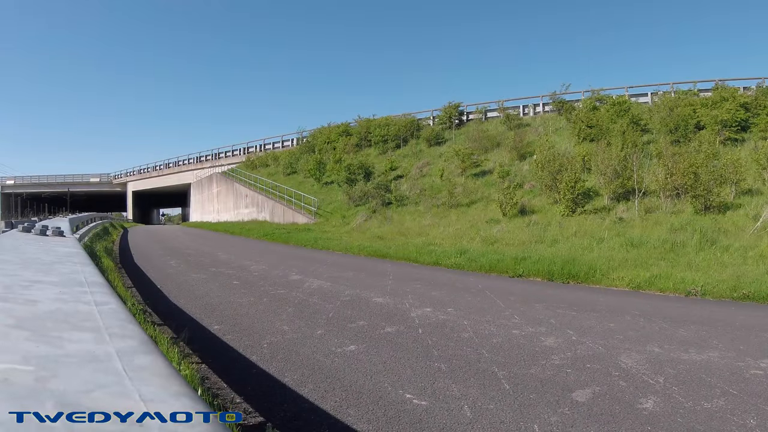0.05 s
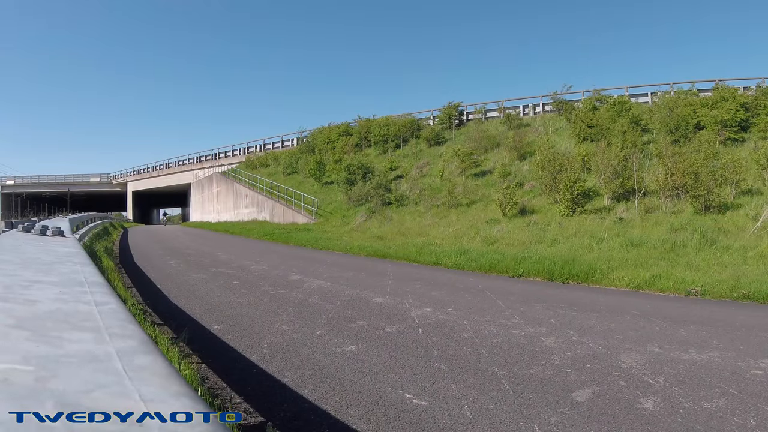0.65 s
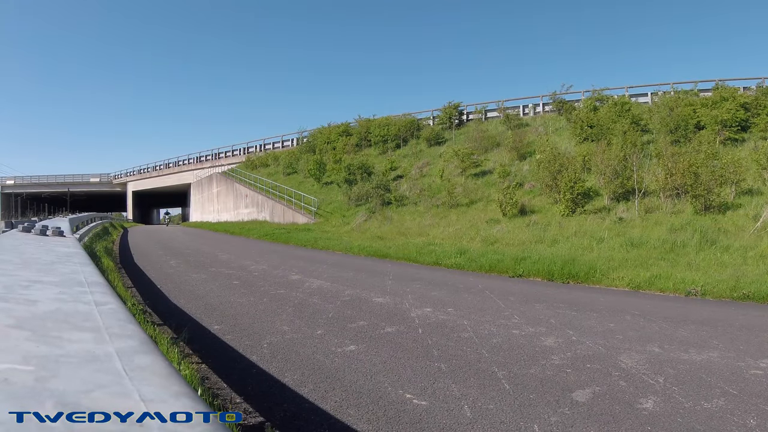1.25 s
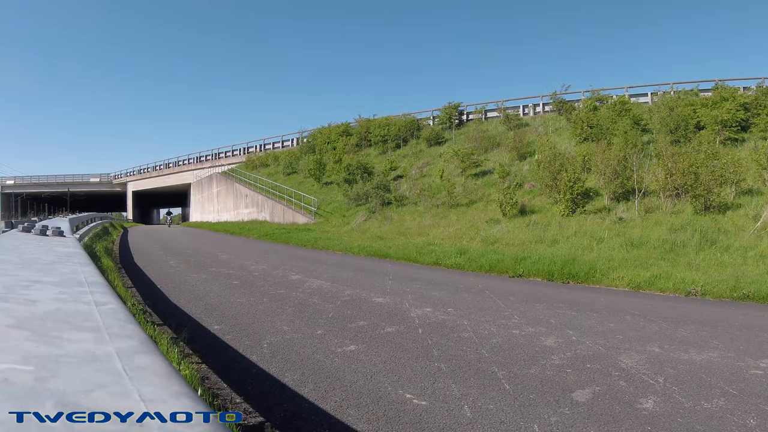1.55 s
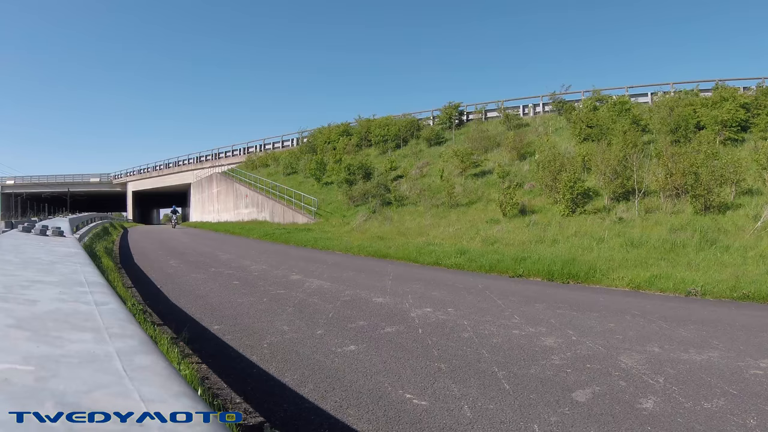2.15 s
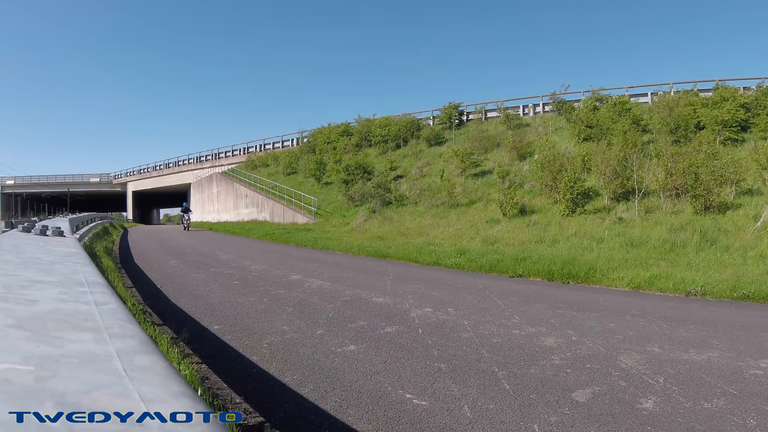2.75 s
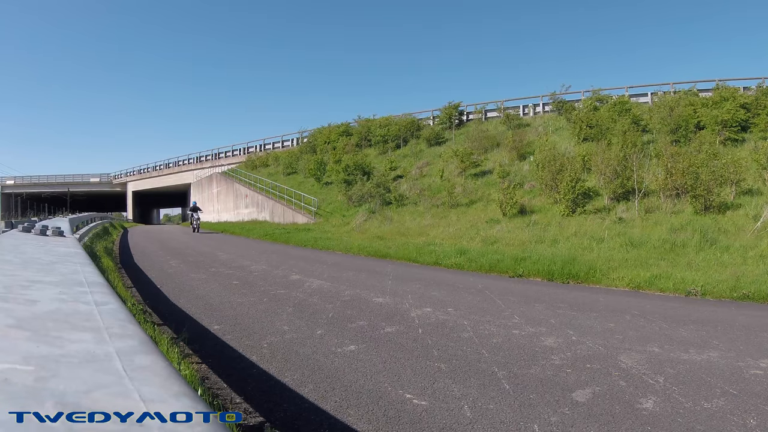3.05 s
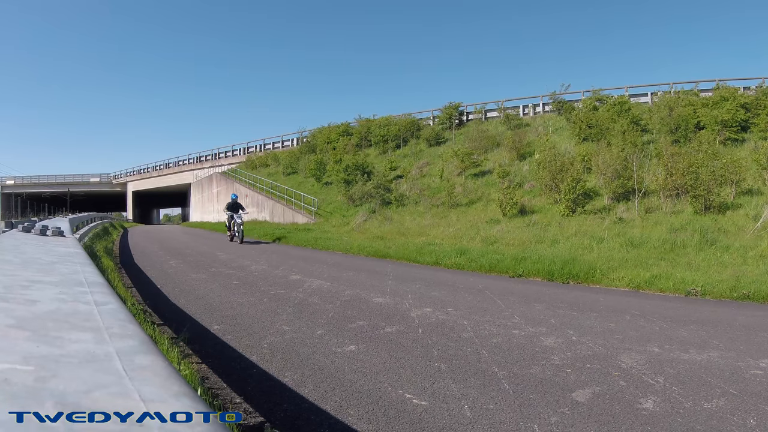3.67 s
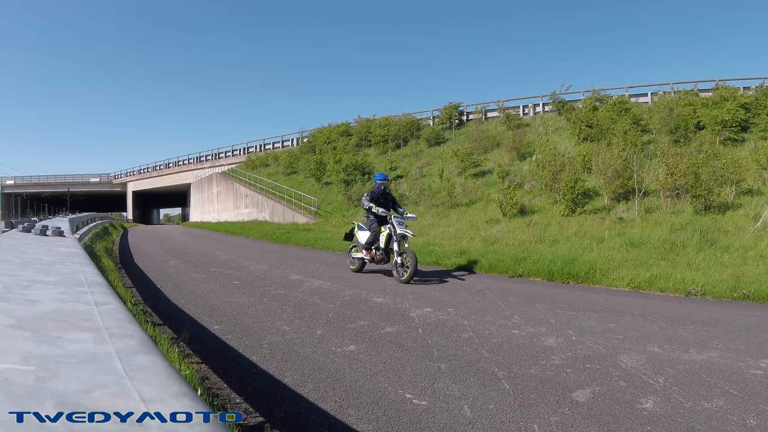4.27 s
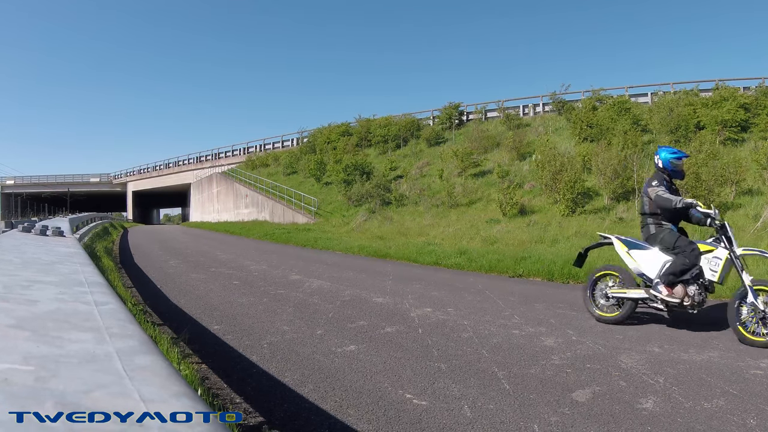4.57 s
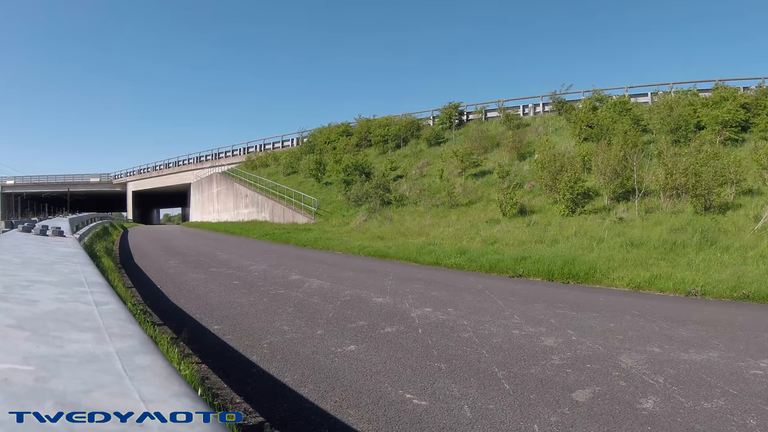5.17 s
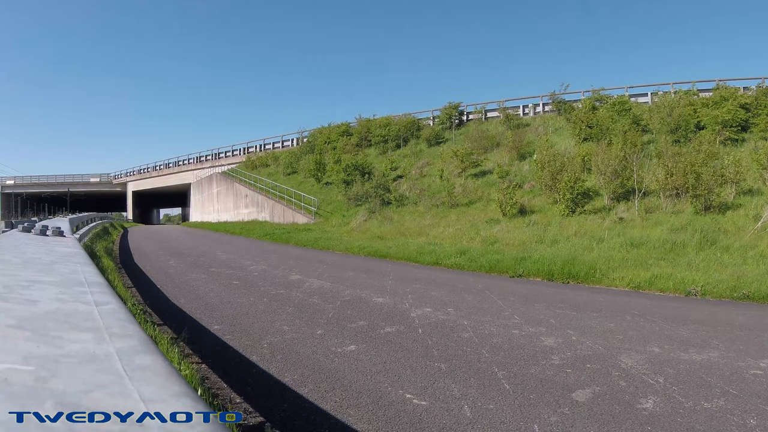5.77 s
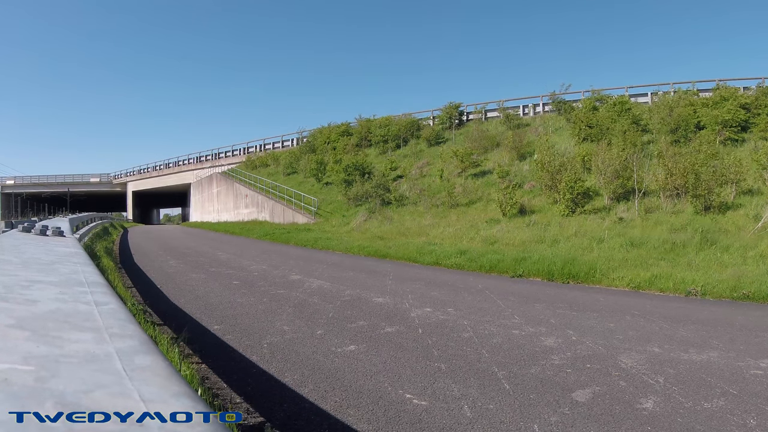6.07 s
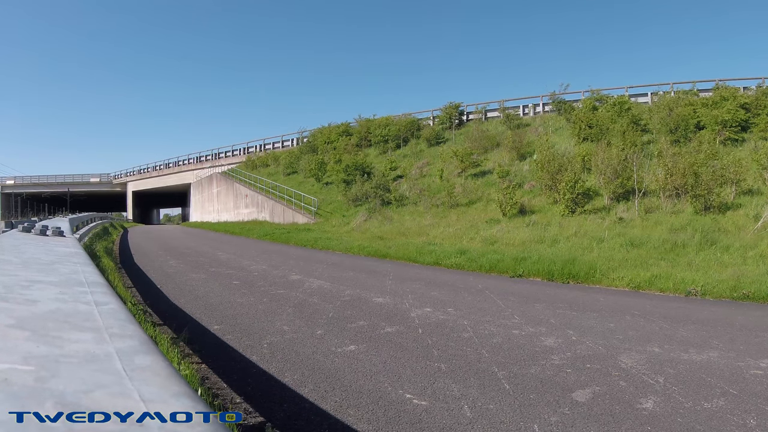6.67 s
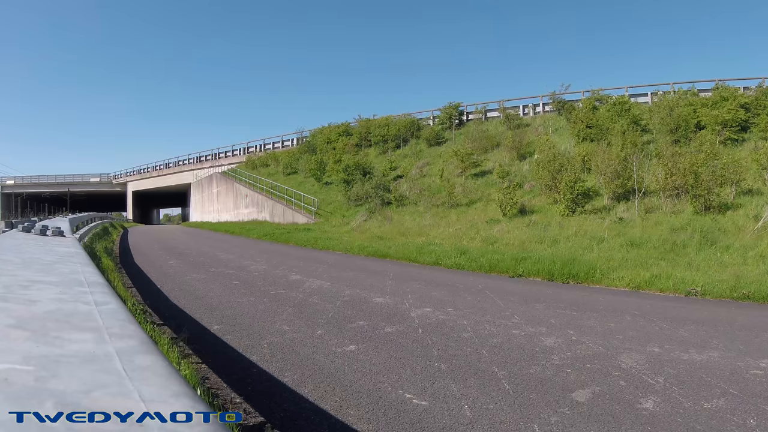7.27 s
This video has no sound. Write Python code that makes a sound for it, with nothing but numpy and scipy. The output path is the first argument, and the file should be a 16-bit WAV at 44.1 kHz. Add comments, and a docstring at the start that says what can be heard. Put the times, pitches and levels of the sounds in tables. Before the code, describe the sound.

Wind gusts on the microphone as a motorcycle revs hard, approaches, rolls past and fades with sputtering exhaust pops.

```python
"""Supermoto wheelie and pass-by

A big single-cylinder bike blips its throttle in an underpass, revs hard into a wheelie, rolls past on a
shut throttle and coasts away, thumping and popping. Each firing pulses the airbox and rings the pipe;
unburnt fuel makes the pops. Valves clatter, gears whine, gusts buffet the microphone.
At the very end the sound jumps, with a tick, to a steady, hissier cruise."""
import sys
import numpy as np
from scipy import signal
from scipy.fft import rfft, irfft
from scipy.io import wavfile
from scipy.ndimage import uniform_filter1d, minimum_filter1d

SR = 44100
rng = np.random.default_rng(int(sys.argv[2]) if len(sys.argv) > 2 else 0)


def log_audio(samples):
    """Write samples as a 16-bit WAV file to the path given in sys.argv[1]."""
    # one column per channel
    frames = np.atleast_2d(samples).T
    # limit to full scale, then quantise
    limited = np.clip(frames, -1, 1)
    pcm = np.round(limited * 32767).astype(np.int16)
    wavfile.write(sys.argv[1], SR, pcm)


N = 332073
T = np.arange(N) / SR

# throttle twists: open t/s, flare length/s, flare rise/Hz, pull t/s, shut t/s, pull rise/Hz
TWISTS = [(1.041, .261, 16.4, 1.302, 1.613, 6.6), (2.875, .28, 15.82, 3.221, 3.624, 4.3)]
# firing rate set by the wheels: t/s, f/Hz
ROLLING_RATE = [(0, 29.49), (1.3, 31.11), (1.7, 33.55), (2.9, 36.79), (3.1, 41.5), (3.3, 43.15),
                (3.85, 48.39), (4.45, 44.95), (5, 39.9), (6, 31.45), (7.1, 23.64)]
# cracks: t/s, body level/dB, body f/Hz, ring level/dB, ring f/Hz, sizzle level/dB, shove level/dB; the rows at
# 5.08, 5.11 and 5.26 s are louder ordinary firings, the rest afterfire pops
CRACKS = [(1.998, -39, 405, -44.5, 1560, -49, -45), (5.082, -38, 420, -35, 1400, -60, -28),
          (5.107, -42, 450, -34.5, 1460, -55, -36), (5.237, -35, 400, -32.5, 1460, -45, -25),
          (5.264, -43, 450, -46, 1680, -59, -33), (5.451, -16, 550, -22, 1970, -23.5, -3.5),
          (5.709, -26.5, 467, -35, 2600, -48, -14.5), (5.982, -36, 410, -38.5, 1130, -56, -35),
          (6.078, -35, 715, -31, 1020, -46, -15), (6.210, -30, 430, -37.5, 1350, -42.5, -29),
          (6.312, -31.5, 610, -36, 1760, -45, -28), (6.347, -47, 600, -48, 1570, -59, -41),
          (6.415, -32, 700, -37, 1550, -48, -25), (6.524, -49, 610, -42, 1620, -61, -35.5),
          (6.632, -41, 720, -36.5, 1470, -62, -43), (6.748, -47, 930, -31.5, 1470, -64, -40),
          (6.787, -51, 700, -45, 1400, -65, -37), (6.826, -53, 700, -45.5, 1400, -70, -39),
          (6.864, -46, 820, -38.5, 1480, -65, -38), (6.905, -48, 700, -43, 1400, -64, -36),
          (6.985, -48, 1200, -46, 2060, -68, -44), (7.028, -47, 700, -45, 1400, -62, -37),
          (7.071, -37, 600, -39, 1410, -60, -36)]
# gear and chain tones: multiple of firing rate, level/dB, peak t/s, half-width/s
MESH_TONES = [(46, -48, 3.93, .11), (72, -53, 3.95, .09), (16, -46, 4.68, .14), (23, -43, 4.82, .2),
              (28, -42, 4.6, .22), (31.7, -38.5, 4.66, .16), (33.7, -41, 4.72, .11), (43, -43, 4.53, .08),
              (36.1, -53, 5.33, .15)]
# upper pipe resonances: f/Hz
PIPE_RINGS_HZ = [1160, 1400, 1720, 2380, 4100]
# wind level, dipping at times: t/s, relative level/dB
WIND_LEVEL = [(0, -27), (.44, -25.5), (.51, -35), (.6, -24.5), (1.2, -26.5), (1.9, -24.5), (2.2, -28),
              (2.7, -31), (3.35, -36), (3.9, -26.5), (4.9, -36.5), (5.3, -31.5), (6.4, -31.5), (6.7, -28),
              (7.15, -25.5), (7.25, -29), (7.53, -26.5)]
# hard gusts: peak t/s, half-width/s, level/dB
HARD_GUSTS = [(0.023, 0.031, -25.5), (0.132, 0.033, -36.5), (0.316, 0.041, -36.5), (0.395, 0.022, -36.5),
              (0.467, 0.014, -31), (0.667, 0.016, -26.5), (0.81, 0.067, -38), (1.008, 0.017, -30),
              (1.7, 0.045, -20.5), (1.827, 0.051, -20.5), (1.951, 0.008, -21.5), (2.001, 0.015, -27),
              (4.236, 0.021, -27), (7.082, 0.02, -26), (7.172, 0.068, -14)]
# airbox facing the listener: t/s, weight
FACING = [(3.55, .047), (3.7, .71), (4.6, .29), (5.4, .062), (7.16, .091), (7.17, .5)]
# engine power ringing in the underpass: t/s, share
UNDERPASS_SHARE = [(1.7, .45), (2.9, .2), (3.12, 0)]

# source spectra: f/Hz, relative level/dB
RUMBLE_EQ = [(8, -13), (25, -2.5), (55, -4.5), (90, -6.5), (150, -14.5), (250, -28), (500, -56.5),
             (1500, -93), (8000, -100)]
BUFFET_EQ = [(30, 5.5), (90, 0.5), (180, 2), (300, -3.5), (500, -13.5), (900, -25.5), (2000, -45),
             (3500, -52.5), (5000, -79), (10000, -102.5)]
CLATTER_EQ = [(100, -6.5), (350, 9), (650, 1), (850, -3), (1050, -2), (1400, -0.5), (2100, -6),
              (2800, -11.5), (4000, -18), (9000, -64)]
HISS_EQ = [(1500, -20.5), (2800, 7), (3600, 3.5), (4700, 3.5), (6200, 0.5), (7200, -14.5), (10500, -21),
           (11800, -33.5), (13500, -29.5), (15500, -66)]
HONK_EQ = [(60, -41), (150, 12.5), (240, 0), (290, 1.5), (335, 0), (410, -2.5), (480, 1.5), (550, -9.5),
           (640, -14), (720, -5), (860, -22), (1100, -30), (1400, -47), (5000, -75)]
SPIT_EQ = [(500, -14), (1300, 10), (2000, 6), (3000, 3), (4700, -3), (6200, -3.5), (7200, -16),
           (10000, -24), (11500, -46), (15000, -62.5)]
TEAR_EQ = [(500, -14.5), (950, 0), (1350, 5.5), (1700, -5), (2000, 2), (2600, -11), (3200, -13.5),
           (6000, -21), (7500, -23), (14000, -56)]
POP_EQ = [(100, 3.5), (500, 11.5), (1500, -2.5), (4000, -2.5), (6200, -11.5), (7500, -16.5), (11000, -30),
          (15000, -54.5)]
GULP_EQ = [(40, 11), (150, 4), (290, 6), (345, 2), (400, 8.5), (520, -5), (660, -8), (830, -22),
           (1020, -38), (1300, -50.5), (3000, -51), (10000, -101)]
BARK_EQ = [(200, -24), (400, 5.5), (520, 0.5), (660, 6), (850, -1.5), (1030, 7), (1250, -8.5), (1750, -5.5),
           (2600, -22.5), (6000, -46), (11000, -51.5)]
RASP_EQ = [(150, -19), (580, -18), (850, 11), (1400, -7.5), (2500, 1), (4000, -7), (5200, -7.5),
           (6200, -13.5), (7300, -25), (11000, -44), (15000, -76)]
THUMP_EQ = [(20, -30.5), (40, -13.5), (80, 7), (125, 8), (170, 1), (250, 1.5), (340, -7.5), (420, -11.5),
            (480, -21.5), (570, -14.5), (800, -26), (1500, -19), (4000, -88), (12000, -100)]
AIR_EQ = [(1000, -10), (4000, -11.5), (9000, 2.5), (12000, -13)]
FIZZ_EQ = [(5000, -25), (7500, 0), (9800, -10), (11000, -30)]
ROAR_EQ = [(500, -28.5), (850, -10.5), (1050, 2.5), (1450, -3), (1800, -9), (2600, -8.5), (6000, -43.5)]

EXIT_S, PASS_S, CRUISE_S = 2.98, 4.674, 7.165  # near the underpass mouth, closest, cruise onset
NEAR_S = .43  # closest distance / speed


def gain_of(db):
    """dB to amplitude."""
    return 10 ** (np.asarray(db) / 20)


def unit_rms(x):
    """Scale to rms 1."""
    return x / np.sqrt(np.mean(x ** 2) + 1e-20)


def curve(rows):
    """Breakpoints to samples."""
    return np.interp(T, *np.transpose(rows))


def ease(u):
    """Smooth step, 0 to 1."""
    return np.sin(np.pi / 2 * np.clip(u, 0, 1)) ** 2


def bump(peak_s, half_width_s):
    """Gaussian window, peak 1."""
    return np.exp(-((T - peak_s) / half_width_s) ** 2)


def noise():
    """White noise, rms 1."""
    return rng.standard_normal(N)


def drift(hz):
    """Low-passed noise, rms 1."""
    return unit_rms(irfft(rfft(noise()) / (1 + (np.fft.rfftfreq(N, 1 / SR) / hz) ** 4), N))


def colour(x, eq, size=8192):
    """Minimum-phase filter of unit energy."""
    hz, db = np.transpose(eq)
    bins_hz = abs(np.fft.fftfreq(size, 1 / SR))
    log_gain = np.log(gain_of(np.interp(np.log(bins_hz + 1), np.log(hz), db)))
    impulse = np.fft.ifft(np.exp(np.conj(signal.hilbert(log_gain)))).real[:size // 2]
    return signal.oaconvolve(x, impulse / np.linalg.norm(impulse))[:len(x)]


def resonate(x, hz, width_hz):
    """Resonance, peak gain 1."""
    return signal.lfilter(*signal.iirpeak(hz, hz / width_hz, fs=SR), x)


def steep_ring(x, hz, width_hz):
    """Double resonance, scaled to the energy of 10 ms at rms 1."""
    ring = resonate(resonate(x, hz, width_hz), hz, width_hz)
    return ring / np.linalg.norm(ring) * np.sqrt(SR / 100)


def echo(x, t60_s, delay_s):
    """Sparse decaying reflections."""
    t = T[:SR]
    taps = rng.standard_normal(SR) * (rng.random(SR) < 2000 / SR)
    taps *= (t > delay_s) * gain_of(-60 * t / t60_s)
    return signal.oaconvolve(x, taps / np.linalg.norm(taps))[:N]


def strokes(cycles, uneven_db):
    """One pulse of random strength per engine cycle, rms 1."""
    at = np.flatnonzero(np.diff(np.floor(cycles)) > 0)
    pulses = np.zeros(N)
    pulses[at] = gain_of(uneven_db * rng.standard_normal(len(at))) / np.sqrt(np.diff(cycles)[at])
    return unit_rms(pulses)


def burst(t, rise_s, fall_s):
    """Exponential rise and decay."""
    return (1 - np.exp(-t / rise_s)) * np.exp(-t / fall_s)


def puffs(pulses, rise_s, fall_s):
    """Turbulence on each pulse, rms 1."""
    return unit_rms(signal.oaconvolve(pulses, burst(T[:SR // 20], rise_s, fall_s))[:N] * noise())


def firing_hz(cruise_hz=30.15, hold_s=.1, drop_s=.06):
    """One firing per two crank turns: rolling rate plus each twist's clutch-slip flare and pull."""
    hz = curve(ROLLING_RATE)
    for open_s, slip_s, flare_hz, pull_s, shut_s, pull_hz in TWISTS:
        flare = np.sin(np.pi * np.clip((T - open_s) / slip_s, 0, 1)) ** 2
        pull = ease((T - pull_s) / (shut_s - hold_s - pull_s)) * ease((shut_s - T) / drop_s)
        hz = hz + flare_hz * flare + pull_hz * pull
    return np.where(T < CRUISE_S, hz, cruise_hz)


def load(open_lag_s=.017, rise_s=.16, shut_lag_s=.084, fall_s=.25):
    """Engine load, 0 to 1, lagging the throttle."""
    return sum(ease((T - open_s - open_lag_s) / rise_s) * ease((shut_s + shut_lag_s - T) / fall_s)
               for open_s, _, _, _, shut_s, _ in TWISTS)


def pass_db(base_db, spread, depth_db_per_s, rev_db_per_hz):
    """Level falls with distance (spread 1: 1/r) and underpass depth, rises with revs above rolling."""
    distance = np.hypot(1, (T - PASS_S) / NEAR_S)
    db = base_db - spread * 20 * np.log10(distance)
    db -= depth_db_per_s * np.maximum(EXIT_S - T, 0)
    return db + rev_db_per_hz * (firing_hz() - curve(ROLLING_RATE))


def part_gain(base_db, spread, depth_db_per_s, rev_db_per_hz, behind_db, load_db, cruise_db):
    """Pass-by gain with tail directivity and load; constant in the cruise."""
    along = (T - PASS_S) / NEAR_S
    behind = .5 + .5 * along / np.hypot(1, along)
    db = pass_db(base_db, spread, depth_db_per_s, rev_db_per_hz) + behind_db * behind + load_db * load()
    return gain_of(np.where(T < CRUISE_S, db, cruise_db))


def throttle_gain(base_db, spread, depth_db_per_s, rev_db_per_hz):
    """Pass-by gain gated by load."""
    return load() * gain_of(pass_db(base_db, spread, depth_db_per_s, rev_db_per_hz))


def air():
    """Faint open-air hiss, plus fizz in the cruise."""
    fizz = gain_of(-64) * (T >= CRUISE_S) * colour(noise(), FIZZ_EQ)
    return fizz + gain_of(-81.5) * colour(noise(), AIR_EQ)


def tick(decay_s=.00044):
    """Dry tick at cruise onset."""
    return gain_of(-24) * (T >= CRUISE_S) * np.exp(-abs(T - CRUISE_S) / decay_s)


def wind():
    """Wind on the microphone: lumpy rumble, low-mid flutter, hard gusts."""
    wind_db = curve(WIND_LEVEL)
    rumble = colour(noise(), RUMBLE_EQ) * gain_of(wind_db + 2 + .66 * drift(17))
    buffet = colour(noise(), BUFFET_EQ) * gain_of(-1 + 2 * drift(47))
    gusts = sum(gain_of(db) * bump(peak_s, half_s) for peak_s, half_s, db in HARD_GUSTS)
    return rumble + (gusts * (T < CRUISE_S) + gain_of(wind_db - 14)) * buffet


def underpass_roar():
    """Tyres and engine blur into a hollow roar, swelling toward the mouth."""
    swell = gain_of(-46 - 19.6 * np.maximum(2.8 - T, 0)) * ease((3.3 - T) / .58)
    return swell * colour(noise(), ROAR_EQ)


def gear_whine(cycles):
    """Meshing teeth: rough tones locked to engine speed, each beamed at the listener briefly."""
    out = np.zeros(N)
    for order, db, peak_s, half_s in MESH_TONES:
        gain = gain_of(db + 2.5 * drift(60)) * bump(peak_s, half_s)
        out += gain * np.sqrt(2) * np.sin(2 * np.pi * order * cycles + drift(45))
    return out


def running_gear(cycles, size=1024):
    """Valves repeat one clatter per cycle; chain and tyres add fresh noise."""
    valves = unit_rms(np.interp(cycles % 1, np.arange(size) / size, rng.standard_normal(size)))
    knocks = gain_of(drift(25) + .082 * np.cos(4 * np.pi * cycles))
    clatter = colour(.64 * valves + .72 * noise(), CLATTER_EQ)
    front, flank = bump(3.85, .29), bump(4.8, .5)  # engine side facing the listener
    front_rings = 1.2 * resonate(clatter, 2150, 220) + resonate(clatter, 3500, 220)
    clatter = clatter + front * front_rings + .5 * flank * resonate(clatter, 1700, 1000)
    hiss = colour(.21 * valves + .69 * noise(), HISS_EQ)
    clatter *= part_gain(-27.5, spread=1.13, depth_db_per_s=7, rev_db_per_hz=.4646,
                         behind_db=-10, load_db=4, cruise_db=-42)
    hiss *= part_gain(-33, spread=1.544, depth_db_per_s=5.5, rev_db_per_hz=.18,
                      behind_db=-12.5, load_db=4, cruise_db=-50.5)
    sound = knocks * (clatter + hiss)
    sound -= .55 * front * resonate(sound, 2850, 600)  # dip between the front rings
    tyres = gain_of(-39.5) * bump(4.5, .42) * colour(noise(), HISS_EQ)
    return sound + tyres


def airbox_honk(cycles):
    """Throttle shut at high revs: the airbox honks forward on the approach."""
    honk = colour(-strokes(cycles - .3, uneven_db=.5), HONK_EQ)
    return gain_of(-30) * bump(3.92, .39) * (1 - load()) * honk


def gas_spit(cycles):
    """A ragged jet at each firing under load."""
    jets = puffs(strokes(cycles + .02, uneven_db=1.5), rise_s=.0008, fall_s=.004)
    return throttle_gain(-36, spread=1.04, depth_db_per_s=-2.5, rev_db_per_hz=0) * colour(jets, SPIT_EQ)


def close_tear(cycles):
    """Firings at close range: coarse tears abreast, crisp ticks from behind."""
    tears = puffs(strokes(cycles - .3, uneven_db=2), rise_s=.001, fall_s=.005)
    ticks = puffs(strokes(cycles + .03, uneven_db=1.3), rise_s=.0005, fall_s=.0015)
    coming, beside, behind = bump(4.52, .16), bump(4.64, .2), bump(4.97, .24)
    tear = colour(gain_of(-36.5) * beside * tears + gain_of(-39) * behind * ticks, TEAR_EQ)
    return tear + 1.1 * coming * resonate(tear, 2450, 600)


def cracks(shove_hz=170, shove_lag_s=.00103, shock_limit=.58):
    """Sharp cracks: unburnt fuel pops, and a few louder firings, ring the pipe and sizzle at its mouth; gas
    swings out and back."""
    out, t = np.zeros(N), T[:SR // 20]
    age_s = np.maximum(t - shove_lag_s, 0)
    shove = burst(age_s, rise_s=.000095, fall_s=.0075) * np.cos(2 * np.pi * shove_hz * age_s)
    burn = burst(t, rise_s=.00054, fall_s=.0022)
    snap = 1.87 * np.exp(-abs(t - .001) / .00004)
    lowpass = signal.butter(4, 7000, fs=SR)
    for start_s, body_db, body_hz, ring_db, ring_hz, sizzle_db, shove_db in CRACKS:
        crack = colour(burn * rng.standard_normal(len(t)) + snap, POP_EQ)
        pop = gain_of(body_db) * steep_ring(crack, body_hz, width_hz=326)
        pop += gain_of(ring_db) * steep_ring(crack, ring_hz, width_hz=.54 * ring_hz)
        pop += gain_of(sizzle_db) * steep_ring(crack, 5040, width_hz=3200)
        shock = shock_limit * np.tanh(pop / shock_limit)  # big cracks steepen and flatten
        start = round(start_s * SR)
        out[start:start + len(t)] += signal.lfilter(*lowpass, shock) + gain_of(shove_db) * shove
    return out


def open_throttle(cycles, suction_lag_s=.0019):
    """Under load the airbox gulps (push, then suction) and the pipe barks at each firing."""
    valve = strokes(cycles - .385, uneven_db=.3)
    gulp = unit_rms(colour(.55 * valve - np.interp(T - suction_lag_s, T, valve), GULP_EQ))
    blast = strokes(cycles + .05 + .0012 * drift(25), uneven_db=.4)
    bark = unit_rms(colour(blast + .28 * puffs(blast, rise_s=.0007, fall_s=.0013), BARK_EQ))
    bark = unit_rms(bark + 1.65 * resonate(bark, 680, 130))  # header pipe
    recoil = np.exp(-((cycles % 1 - .19) / .07) ** 2)  # gas sucked back after each blast
    bark -= .35 * (recoil - recoil.mean())
    gulp *= throttle_gain(-14.5, spread=1, depth_db_per_s=-1.5, rev_db_per_hz=.22)
    bark *= throttle_gain(-22.5, spread=.9, depth_db_per_s=5, rev_db_per_hz=.22)
    return gulp + bark


def pipe_rasp(cycles, dull_hz=2300):
    """Spurts at the pipe mouth, each favouring one upper ring; duller far away."""
    spurts = colour(puffs(strokes(cycles, uneven_db=1.1), rise_s=.0006, fall_s=.0014), RASP_EQ)
    pick = rng.integers(len(PIPE_RINGS_HZ), size=N)[cycles.astype(int)]
    rings = sum(resonate(spurts * (pick == k), hz, .42 * hz) for k, hz in enumerate(PIPE_RINGS_HZ))
    bright = unit_rms(spurts + 1.4 * rings)
    dull = signal.lfilter(*signal.butter(1, dull_hz, fs=SR), bright)
    far = ease((T - 6.3) / .32)
    return (1 - far) * bright + far * dull


def exhaust(cycles, silencer_hz=121, growl_hz=347):
    """Each firing shoves the air, booms in the silencer, growls in the pipe and rasps at its mouth."""
    sputter = ease((T - 5.3) / .3) * (T < CRUISE_S)  # uneven firing while coasting
    jitter = (.002 + .007 * sputter) * drift(20)
    firings = strokes(cycles + jitter, uneven_db=.4) * gain_of(.7 * sputter * drift(25))
    airbox_push = .4 * curve(FACING) * strokes(cycles - .37, uneven_db=1.1)
    push = colour(firings + airbox_push, THUMP_EQ)
    thump = unit_rms(push + gain_of(12.5) * resonate(push, silencer_hz, width_hz=38))
    growl = unit_rms(resonate(push, growl_hz, width_hz=200))
    rasp = pipe_rasp(cycles + .03)
    thump *= part_gain(-21.5, spread=.52, depth_db_per_s=14, rev_db_per_hz=.23,
                       behind_db=0, load_db=-1, cruise_db=-27)
    growl *= part_gain(-34, spread=1.31, depth_db_per_s=8, rev_db_per_hz=1.5,
                       behind_db=5.5, load_db=5, cruise_db=-52)
    rasp *= part_gain(-55, spread=.6, depth_db_per_s=13, rev_db_per_hz=.89,
                      behind_db=9, load_db=6, cruise_db=-64)
    aim_db = 2.5 * bump(5.25, .15)  # pipe points at the listener
    return gain_of(aim_db) * (thump + growl + rasp)


def scene():
    """Engine with its reflections, running gear and background; mono."""
    cycles = np.cumsum(firing_hz()) / SR
    engine = exhaust(cycles) + close_tear(cycles) + open_throttle(cycles)
    engine = engine + airbox_honk(cycles) + gas_spit(cycles) + cracks()
    inside = curve(UNDERPASS_SHARE)
    direct = engine * np.sqrt(1 - inside)
    underpass = echo(engine * np.sqrt(inside), t60_s=.36, delay_s=.0037)
    grass_bank = gain_of(-18.5) * echo(engine, t60_s=1, delay_s=.026)
    bike = direct + underpass + grass_bank + running_gear(cycles) + gear_whine(cycles)
    return (bike + underpass_roar() + wind() + air() + tick())[None]


def record(dry, ceiling_db=-10.2, recovery_db_per_s=85, cutoff_hz=15100):
    """Fast peak limiter, then low-pass."""
    peak_db = 20 * np.log10(abs(dry[0]) + 1e-9)
    fall_db = T * recovery_db_per_s
    held_db = np.maximum.accumulate(peak_db + fall_db) - fall_db
    over_db = np.maximum(held_db - ceiling_db, 0)
    limited = dry * gain_of(uniform_filter1d(minimum_filter1d(-over_db, size=32), size=32))
    lowpass = signal.firwin(511, cutoff_hz, window=("kaiser", 9), fs=SR)
    return signal.oaconvolve(limited, lowpass[None], "same")


dry = scene()
out = record(dry)
log_audio(out)
```